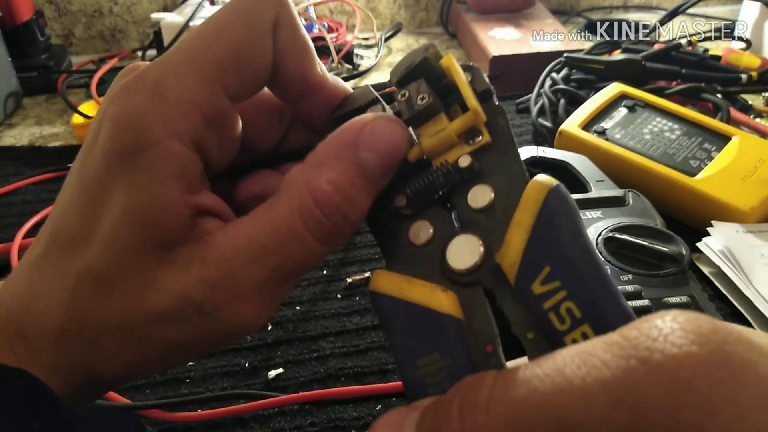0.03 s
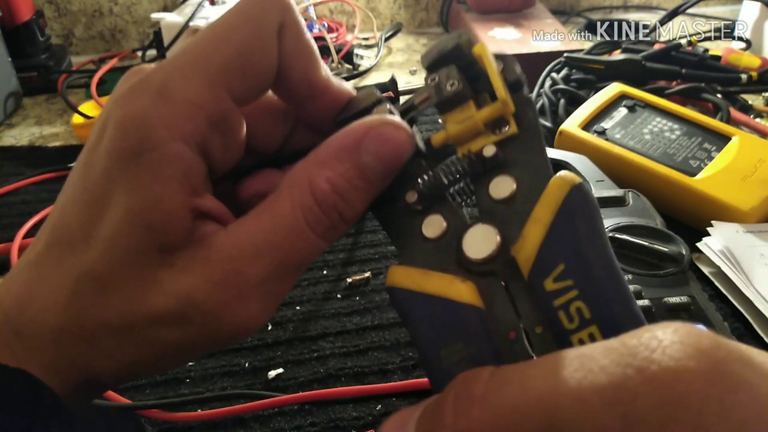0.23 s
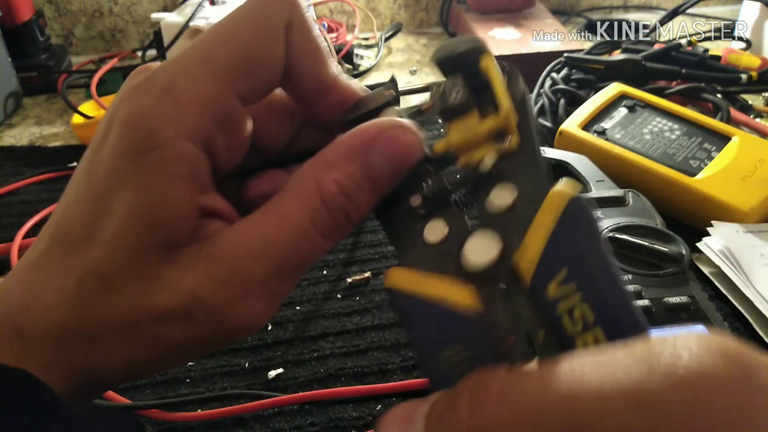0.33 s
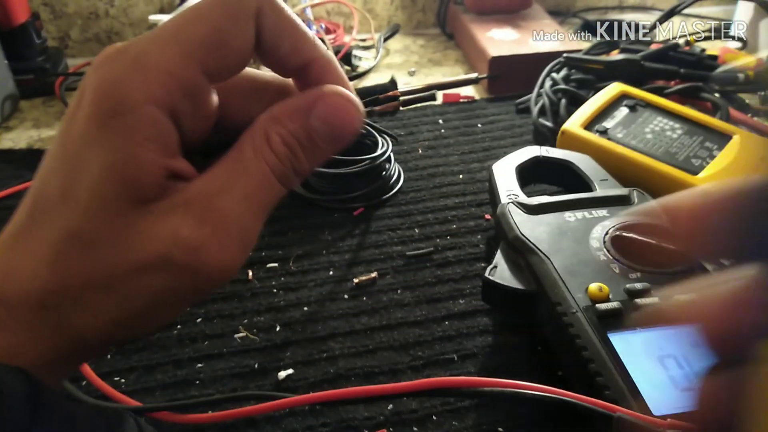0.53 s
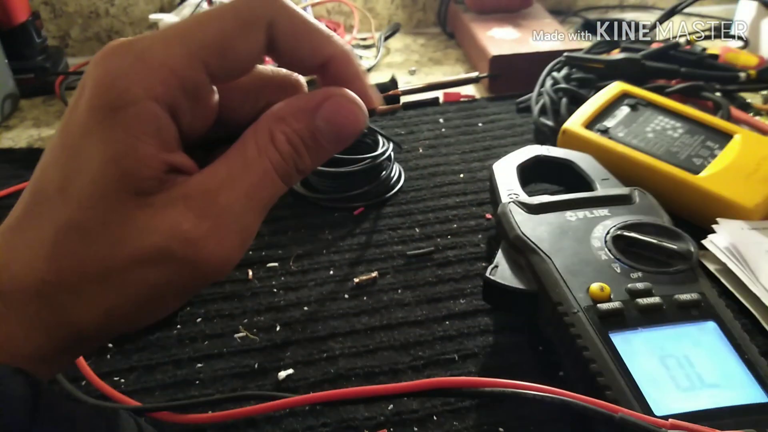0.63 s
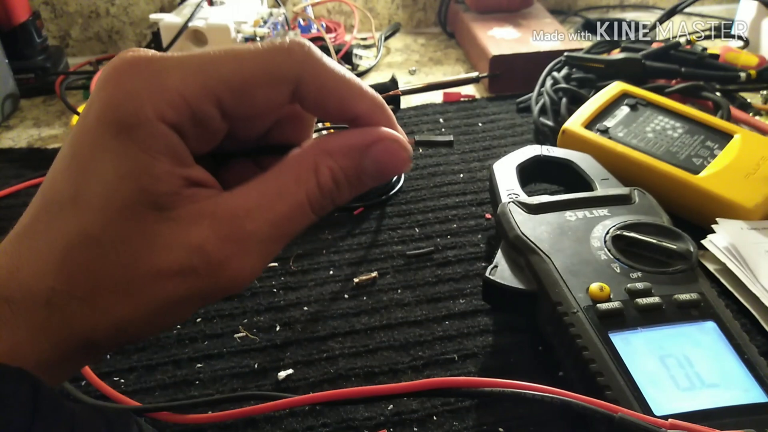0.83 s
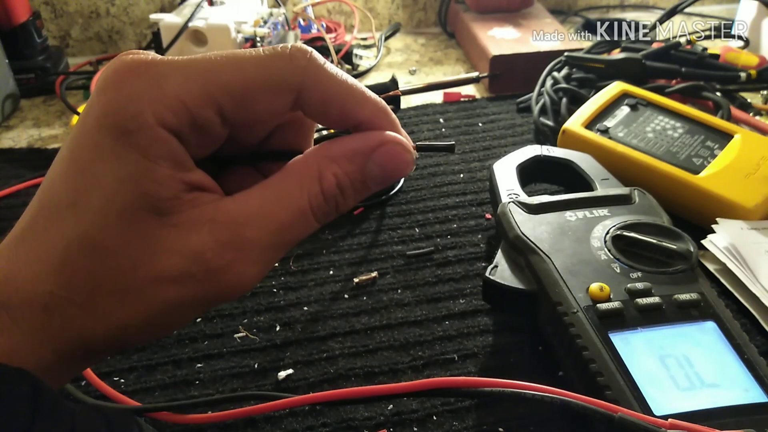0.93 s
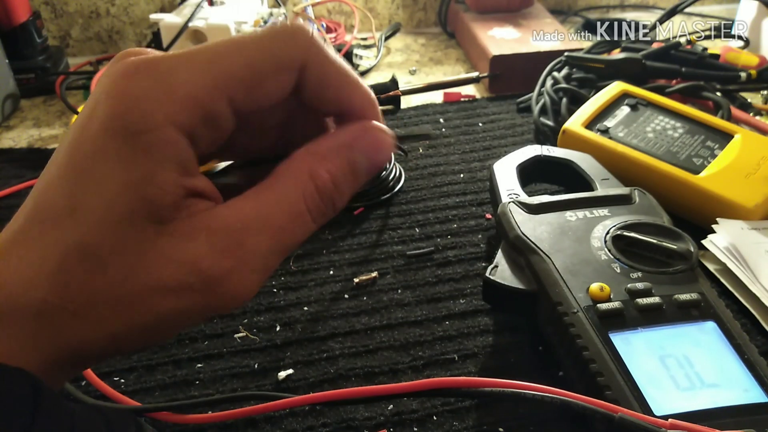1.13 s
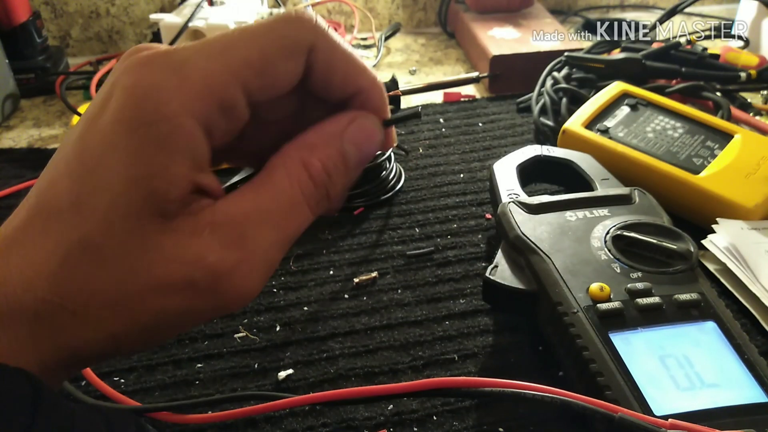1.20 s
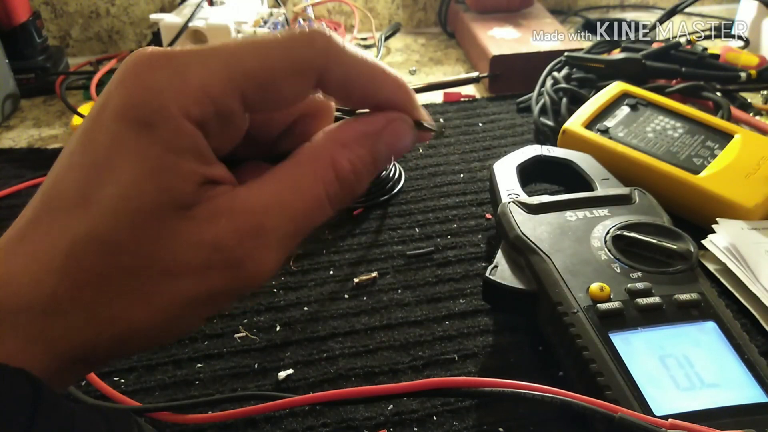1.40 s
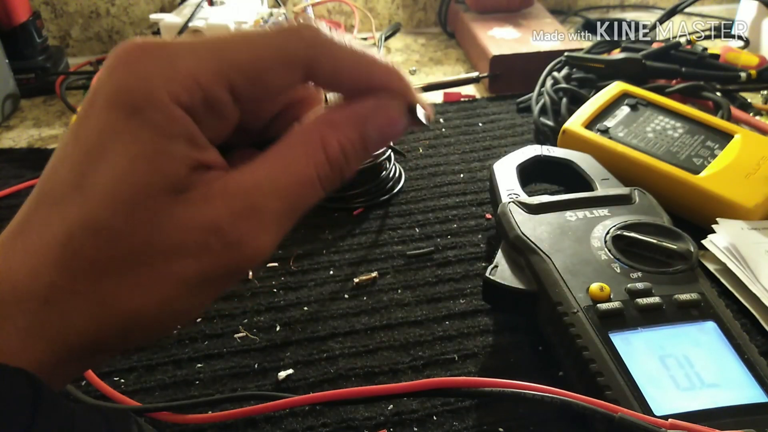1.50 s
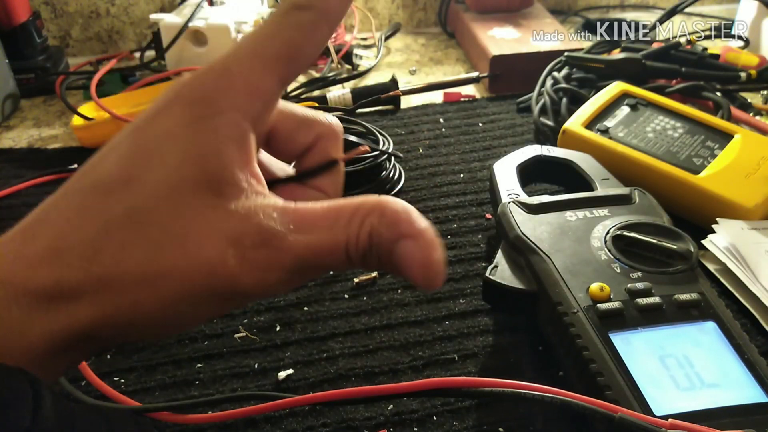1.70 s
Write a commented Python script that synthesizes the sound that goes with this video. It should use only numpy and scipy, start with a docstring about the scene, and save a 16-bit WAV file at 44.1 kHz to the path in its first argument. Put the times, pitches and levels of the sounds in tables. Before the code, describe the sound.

A wire stripper snaps sharply through insulation, close to the microphone. Its handles are let go and the steel parts clatter open with a dull knock. Fingers then tick faintly on the wire, over a low hum in a small workshop.

```python
"""A self-adjusting wire stripper is squeezed close by, and its jaws snap through the insulation.
The handles are let go: the latch clicks and the sprung steel linkage clatters open with a dull
knock in the hand. Each hit is a sharp crack plus a short, dying noise. Fingers rub and tick on
the wire, mostly afterwards. A small workshop echoes, with mains hum and soft hiss behind it all."""
import sys
import numpy as np
from scipy import signal
from scipy.fft import rfft, irfft, next_fast_len
from scipy.io import wavfile
from scipy.ndimage import uniform_filter1d

SR = 44100
rng = np.random.default_rng(int(sys.argv[2]) if len(sys.argv) > 2 else 0)


def to_wav(s):
    """Save 16-bit WAV."""
    ch = np.atleast_2d(s).T  # columns
    pcm = np.round(np.clip(ch, -1, 1) * 32767)  # PCM
    wavfile.write(sys.argv[1], SR, pcm.astype(np.int16))


N = 77175


# A fade time (t60) is how long a sound takes to drop by 60 dB.
# The jaws bite: (time [s], level [dB], fade time [s], left ear delay [ms])
JAW_HITS = [(.2275, -14.5, 0.024, 0.22), (.2324, -15, 0.021, 0.31), (.2347, 0, 0.009, 0.26),
            (.2353, -6, 0.032, 0.3), (.2392, -17, 0.018, 0.18)]
# How the jaws boost or cut each pitch: (frequency [Hz], level [dB])
JAW_TONE = [(60, -29), (400, -16.5), (900, -14.5), (1400, -9), (2000, 1), (2700, -3.5), (3600, -5),
            (4500, -3), (6000, -12), (8000, -5), (9300, -15), (10500, -26), (15000, -35.5)]
# Notes the jaws ring at: (frequency [Hz], level [dB], fade time [s])
JAW_NOTES = [(1986, -6, 0.16), (2220, -11, 0.12), (2590, -15.5, 0.43), (3090, -18.5, 0.35),
             (4010, -9.5, .13)]

def jaw_snap():
    """The jaws break through the insulation and ring briefly."""
    hits = contacts(JAW_HITS, JAW_TONE, crack_db=10, chatter_db=10)
    return ringing(hits, JAW_NOTES, ring_db=-45)


# The latch lets go: (time [s], level [dB], fade time [s], left ear delay [ms])
LATCH_HITS = [(.3848, -16.5, 0.011, .3), (.3906, -19.5, 0.031, 0.33)]
# The latch's thin tone: (frequency [Hz], level [dB])
LATCH_TONE = [(700, -30.5), (1400, -13), (2100, -11), (2900, -16.5), (4400, 4), (5500, -6.5), (7300, -9.5),
              (10500, -32)]
# Steel parts meet: (time [s], level [dB], fade time [s], left ear delay [ms])
LINKAGE_HITS = [(.4119, -13.5, 0.01, 0.16), (.4132, -8.5, 0.014, 0.43), (.4145, -4, 0.0073, 0.49),
                (.4159, -10.5, .006, .4), (.4333, -15.5, 0.013, -0.13), (.4345, -4.5, 0.04, -0.22),
                (.4375, -10, .025, -.27), (.4418, -12.5, 0.014, 0.15), (.4431, -7.5, 0.024, 0),
                (.448, -8, 0.084, -0.042), (.4542, -11, .035, -0.31)]
# The linkage's bright tone: (frequency [Hz], level [dB])
LINKAGE_TONE = [(100, -28.5), (800, -19.5), (1500, -11), (2200, -11), (3000, -11), (3800, -2.5),
                (5400, -2.5), (6800, -2.5), (8000, -5), (9500, -11), (12000, -13.5), (14000, -10),
                (15500, -52.5)]
# Notes its plates ring at: (frequency [Hz], level [dB], fade time [s])
LINKAGE_NOTES = [(1360, -18.5, 0.38), (3750, -16, .1), (4850, -20, 0.21), (5520, -19.5, .33),
                 (5810, -17, 0.51), (7100, -20, 0.16)]

def spring_open():
    """The latch lets go and the spring throws the steel parts against each other."""
    latch = contacts(LATCH_HITS, LATCH_TONE, crack_db=-12, chatter_db=15)
    clatter = contacts(LINKAGE_HITS, LINKAGE_TONE, crack_db=5, chatter_db=10.5)
    return latch + ringing(clatter, LINKAGE_NOTES, ring_db=-51)


# The handles knock: (time [s], level [dB], fade time [s], left ear delay [ms])
HANDLE_HITS = [(.4232, -19.5, 0.019, 0.14), (.4252, -19, 0.0089, 0.24), (.4265, -11.5, 0.0116, 0.36),
               (.431, -12, 0.068, 0.24), (.4425, -19.5, 0.15, 0.28), (.4545, -22.5, 0.059, 0.012)]
# Their dull tone: (frequency [Hz], level [dB])
HANDLE_TONE = [(40, -1), (150, -6), (300, 6), (500, 2), (720, -1.5), (950, -12.5), (1500, -6), (2200, -3),
               (3300, -0.5), (5000, -10), (15000, -43.5)]
# Notes they ring at: (frequency [Hz], level [dB], fade time [s])
HANDLE_NOTES = [(494.4, 7, .035), (620, 1, 0.037), (712, 14.5, 0.012), (835, 4.5, 0.068), (996, 8, 0.11)]
# Tone change on the tool's far (left) side: (frequency [Hz], level [dB])
FAR_SIDE_TONE = [(100, -3), (380, -15.5), (700, -2.5), (6000, 3.5)]

def handle_knock():
    """The hollow handles knock in the hand and ring at low notes."""
    hits = contacts(HANDLE_HITS, HANDLE_TONE, crack_db=14, chatter_db=15)
    left, right = ringing(hits, HANDLE_NOTES, ring_db=-56)
    return np.array([coloured(left, FAR_SIDE_TONE), right])


# The hand jolts: (time [s], level [dB], frequency [Hz], fade time [s], left compared to right [dB])
HAND_JOLTS = [(0.233, -49.5, 60, 0.099, -3.5), (0.428, -29.5, 98.05, 0.058, -25.5),
              (0.448, -31, 52.4, 0.17, -13.5)]

def hand_thuds():
    """Each jolt of the hand is one low note that dies quickly."""
    out, t = np.zeros((2, N)), np.arange(SR // 3) / SR
    rise = 1 - fade(t, t60=.025)
    for start, db, hz, t60, left_db in HAND_JOLTS:
        thud = np.sin(2 * np.pi * hz * t) * fade(t, t60) * rise
        add(out, amp([[db + left_db], [db]]) * thud, start)
    return out


# Light ticks of the wire: (time [s], level [dB], fade time [s], frequency [Hz], width [octaves])
WIRE_TICKS = [(.076, -33, 0.019, 2160, 0.74), (1.146, -38, 0.0091, 5330, 0.35),
              (1.449, -37.5, 0.074, 5100, 1.2), (1.456, -35, 0.072, 4620, 1.06),
              (1.571, -35.5, 0.0063, 3750, 0.48)]
# Fingers rub the insulation: (time [s], swell time [s], level [dB], frequency [Hz], width [octaves])
FINGER_RUBS = [(-.02, 0.032, -76.5, 9140, 0.36), (0, 0.089, -83, 2890, 0.5), (.16, 0.053, -70, 4200, 0.47),
               (1.111, 0.04, -76.5, 5780, 0.25), (1.119, 0.12, -86, 2600, 0.29),
               (1.17, 0.047, -79, 1320, 0.38), (1.294, 0.025, -71.5, 6360, 0.39),
               (1.576, 0.016, -80.5, 4210, 0.37)]
# Notes the coil of wire rings at: (frequency [Hz], level [dB], fade time [s])
WIRE_NOTES = [(1332, -3.5, 0.33), (3990, -13.5, .12), (5624, -9, 0.28)]

def fingers_on_wire():
    """Faint ticks and scratchy rubs between the fingers set the coil of wire ringing."""
    out, t = np.zeros((2, N)), np.arange(N) / SR
    for start, db, t60, hz, octaves in WIRE_TICKS:
        tick = np.zeros((2, N))
        add(tick, amp(db) * burst(t60), start)
        out += band(tick, hz, octaves)
    for start, swell_s, db, hz, octaves in FINGER_RUBS:
        flicker_db = 4 * unit(uniform_filter1d(rng.standard_normal(N), size=90))
        scratch = unit(band(amp(flicker_db) * rng.standard_normal((2, N)), hz, octaves))
        progress = np.maximum(t - start, 0) / swell_s
        stroke = progress * np.exp(.5 * (1 - progress ** 2))  # loudest when progress is 1
        out += amp(db) * scratch * stroke
    return ringing(out, WIRE_NOTES, ring_db=-49)


def contacts(hits, tone, crack_db, chatter_db):
    """Each hit is a sharp crack and a brief noisy chatter, heard through the part's body."""
    out = np.zeros((2, N))
    for start, db, t60, late_ms in hits:
        middle, side = amp(chatter_db) * burst(t60) * [[1], [.5]]
        hit = np.array([middle + side, middle - side])
        hit[:, 0] = amp(crack_db)  # the crack is one sample long
        add(out, amp(db) * hit, start, late_ms)
    return coloured(out, tone)


def ringing(x, notes, ring_db):
    """A struck part rings on at its own notes after every hit."""
    t = np.arange(SR // 3) / SR
    ring = sum(amp(db) * fade(t, t60) * np.cos(2 * np.pi * hz * t + rng.uniform(-1, 1, (2, 1)))
               for hz, db, t60 in notes)
    return x + amp(ring_db) * signal.fftconvolve(x, ring, axes=1)[:, :N]


# How long the room echoes: (frequency [Hz], fade time [s])
ECHO_FADE = [(300, 0.067), (1300, 0.26), (3800, 0.25), (5700, 0.24), (9000, 0.24), (14000, 0.27)]
# The echo's tone: (frequency [Hz], level [dB])
ECHO_TONE = [(500, -4.5), (1500, -10), (14000, -8)]

def workshop(x, room_db):
    """Sound bounces quickly off the bench, then lingers in the room."""
    hz, t, noise = signal.stft(rng.standard_normal((2, SR // 2)), SR, nperseg=256)
    dying = noise * fade(t, along(ECHO_FADE, hz)[:, None])
    tail = signal.istft(dying * amp(along(ECHO_TONE, hz))[:, None], SR, nperseg=256)[1]
    echo = np.zeros((2, SR))
    add(echo, amp(-9) * burst(t60=.13), start=.001)  # the bench
    add(echo, amp(room_db) * tail / np.linalg.norm(tail[0]), start=.005)
    return x + signal.fftconvolve(x, echo, axes=1)[:, :N]


# The notes in the hum: (multiple of HUM_HZ, level [dB])
HUM_NOTES = [(1, -48.5), (2, -81)]
HUM_HZ = 120

def mains_hum():
    """Mains power hums steadily, a little louder on the left."""
    t = np.arange(N) / SR
    hum = sum(amp(db) * np.sqrt(2) * np.sin(2 * np.pi * (multiple * HUM_HZ * t + rng.random()))
              for multiple, db in HUM_NOTES)
    return hum * amp([[1], [-1]])


# The tone of the room's air: (frequency [Hz], level [dB])
AIR_TONE = [(20, -8.5), (80, -1.5), (160, -11), (300, -14.5), (600, -27.5), (1200, -31), (4000, -38.5),
            (11000, -45), (15000, -52.5)]
# Its loudness, and its stereo width: (frequency [Hz], side over middle [ratio])
AIR_DB, AIR_WIDTH = -69.5, [(250, .36), (1000, .74), (4000, .99)]

def room_air():
    """The still room gives a faint rumble and hiss, wider in the treble."""
    middle, side = filtered(rng.standard_normal((2, N)), lambda hz: amp(along(AIR_TONE, hz)))
    side = filtered(side, lambda hz: along(AIR_WIDTH, hz))
    return amp(AIR_DB) * unit(np.array([middle + side, middle - side]))


def amp(db):
    """Turn decibels into a multiplier."""
    return 10 ** (np.asarray(db) / 20)


def unit(x):
    """Scale to an average (rms) level of 1."""
    return x / np.sqrt(np.mean(x ** 2) + 1e-20)


def along(points, hz):
    """Read between a table's rows on a pitch (log) scale."""
    frequencies, values = np.transpose(points)
    return np.interp(np.log(hz + 1), np.log(frequencies + 1), values)


def filtered(x, response):
    """Multiply each frequency in x by response(hz)."""
    size = 2 * next_fast_len(N)
    return irfft(rfft(x, size) * response(np.fft.rfftfreq(size, 1 / SR)), size)[..., :N]


def coloured(x, tone):
    """Boost or cut each pitch as a tone table says."""
    def response(hz):
        cepstrum = irfft(np.log(amp(along(tone, hz))))
        half = len(cepstrum) // 2
        cepstrum[1:half] *= 2  # folded forward, so nothing sounds before its hit
        cepstrum[half + 1:] = 0
        return np.exp(rfft(cepstrum))
    return filtered(x, response)


def band(x, hz, octaves):
    """Keep only the pitches around hz."""
    return filtered(x, lambda f: np.exp(-.5 * (np.log2((f + 1) / hz) / octaves) ** 2))


def fade(t, t60):
    """Die away by 60 dB every t60 seconds."""
    return np.exp(-np.log(1000) * t / np.maximum(t60, 1e-4))


def burst(t60):
    """A dying puff of noise with energy 1, one for each ear."""
    t = np.arange(SR // 3) / SR
    spectrum = rfft(rng.standard_normal((2, len(t))) * fade(t, t60))
    even = irfft(spectrum / (np.abs(spectrum) + 1e-12))  # all frequencies equally strong
    puff = even * fade(t, 2 * t60)
    return puff / np.linalg.norm(puff, axis=1, keepdims=True)


def add(out, x, start, late_ms=0):
    """Mix in a stereo sound at start seconds, the left side late_ms later."""
    for side, at in enumerate((start + late_ms / 1000, start)):
        part = out[side, round(at * SR):][:x.shape[1]]
        part += x[side, :len(part)]


# The tone of each side of the microphone: (frequency [Hz], level [dB])
LEFT_TONE = [(100, 5.5), (1300, 0.5), (3200, -1), (4400, 1.5), (6000, 3.5), (8000, 0), (9300, 4),
             (13500, -1)]
RIGHT_TONE = [(100, 3), (1300, 6.5), (3200, 2.5), (4400, 5), (6000, -2.5), (8000, -4), (9000, -16.5),
              (11500, -10), (14000, -13)]

def scene():
    """The tool and wire reach each side with its own tone, over the hum and air."""
    snap = workshop(jaw_snap(), room_db=-11.5)
    steel, handles = spring_open(), handle_knock()
    release = workshop(steel, room_db=-9) + workshop(handles, room_db=-17.5)
    wire = workshop(fingers_on_wire(), room_db=-4)
    left, right = snap + release + hand_thuds() + wire
    return np.array([coloured(left, LEFT_TONE), coloured(right, RIGHT_TONE)]) + mains_hum() + room_air()


def record(dry):
    """Cut off the very highest treble."""
    top_hz = 14900
    return filtered(dry, lambda hz: 1 / np.sqrt(1 + (hz / top_hz) ** 80))


dry = scene()
out = record(dry)
to_wav(out)
```